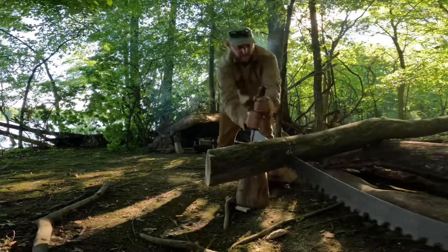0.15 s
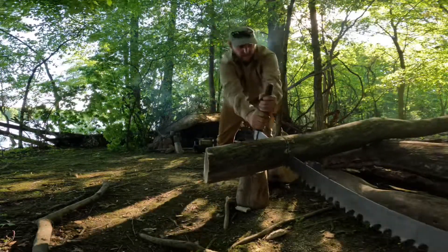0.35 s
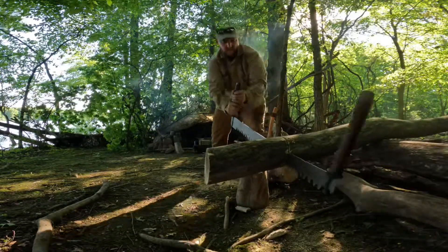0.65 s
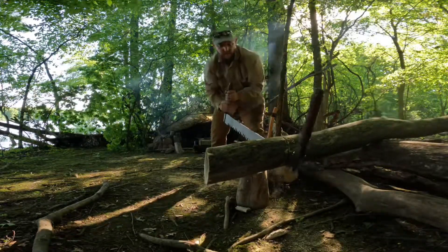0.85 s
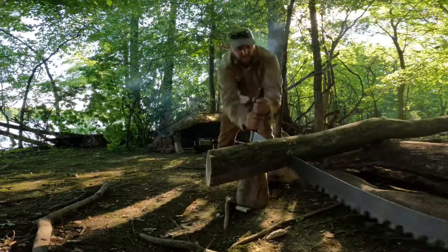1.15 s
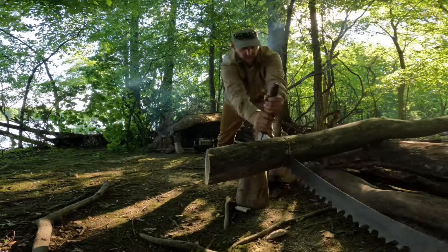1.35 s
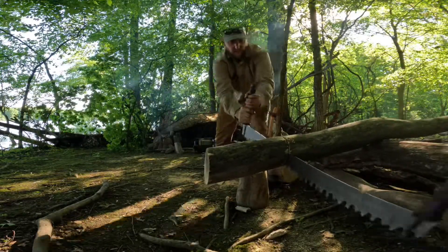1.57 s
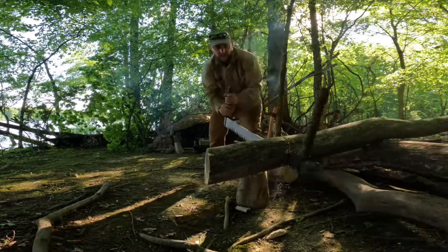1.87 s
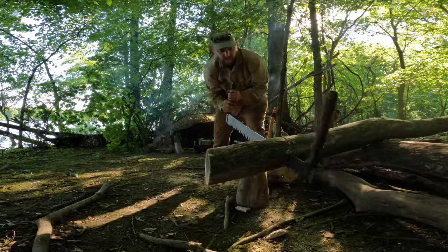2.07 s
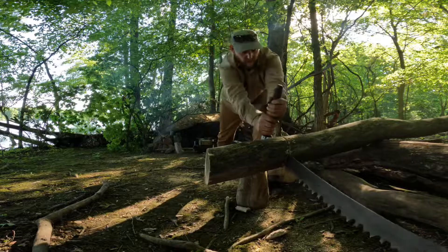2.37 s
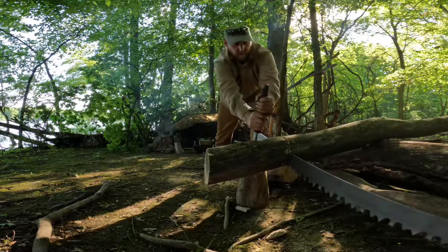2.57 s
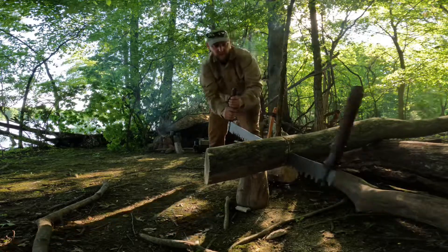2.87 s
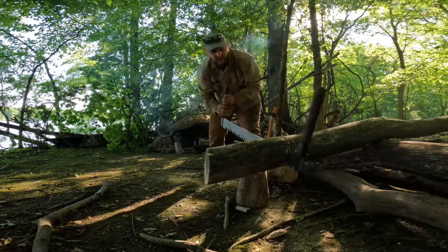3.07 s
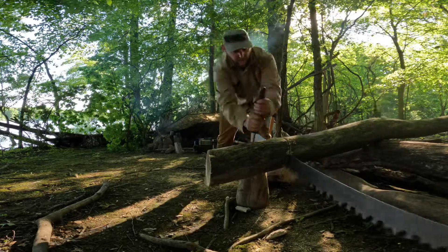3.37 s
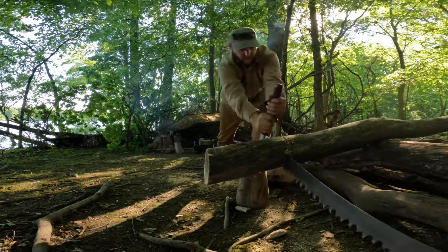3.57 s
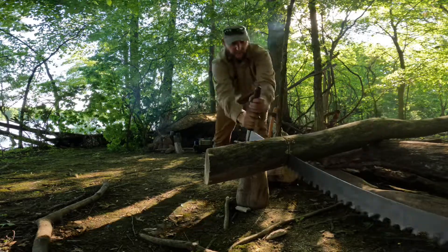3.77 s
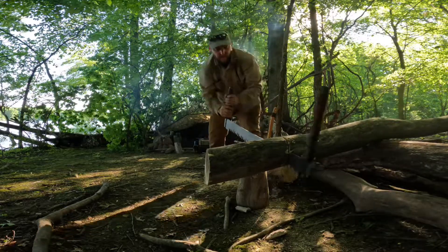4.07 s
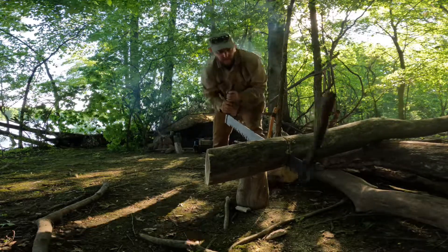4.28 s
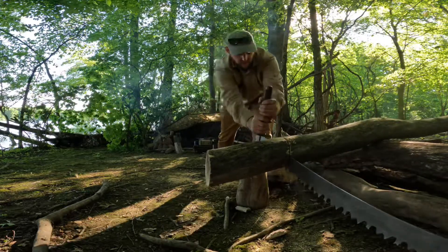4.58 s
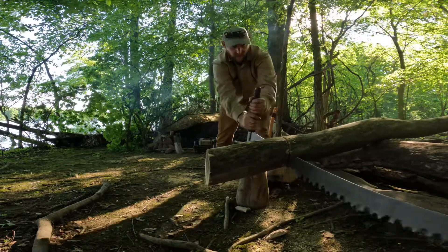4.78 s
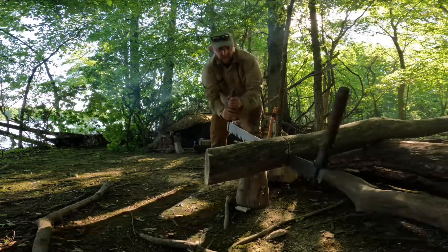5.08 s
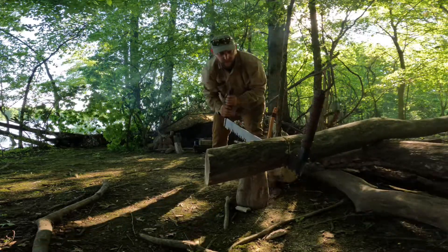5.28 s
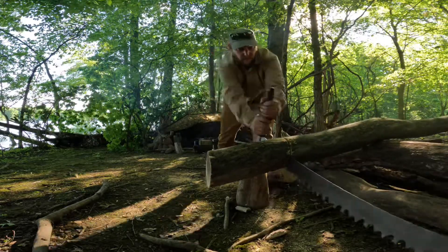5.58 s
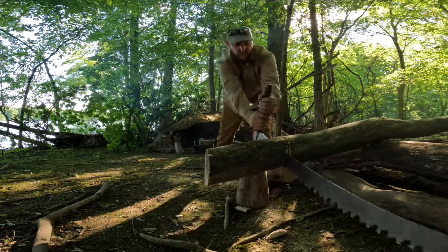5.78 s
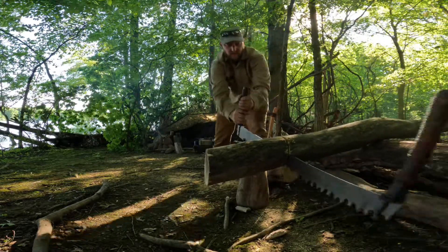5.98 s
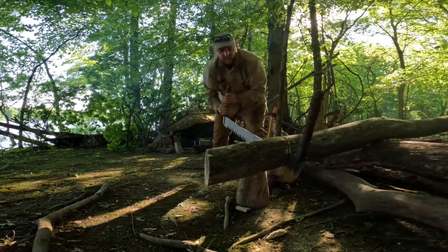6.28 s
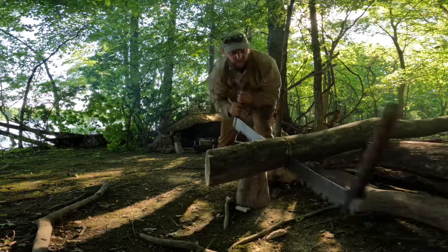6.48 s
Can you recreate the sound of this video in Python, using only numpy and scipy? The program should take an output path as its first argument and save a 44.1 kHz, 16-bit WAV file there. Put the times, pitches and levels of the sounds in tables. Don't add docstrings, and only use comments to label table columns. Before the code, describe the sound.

Close to the microphone, a big toothed saw works steadily through a log in a quiet wood. Each push is a loud, bright, rasping tear of steel and fibres; each return pull is much softer, longer and snagging. The blade's free end sings thinly after the pushes, the handle and cut tick at the turns, and the log thuds low beneath. Sawing is still under way at the end.

```python
import sys
import numpy as np
from scipy import signal
from scipy.fft import rfft, irfft, next_fast_len
from scipy.io import wavfile
from scipy.ndimage import uniform_filter1d, map_coordinates

SR = 44100
rng = np.random.default_rng(int(sys.argv[2]) if len(sys.argv) > 2 else 0)


def magnitude_from_level(level_db):
    exponent = np.asarray(level_db, float) / 20
    return 10 ** exponent


def generate_wav(sig):
    pcm = np.round(np.clip(np.atleast_2d(sig).T, -1, 1) * 32767).astype(np.int16)
    wavfile.write(sys.argv[1], SR, pcm)


N = 292810


def saw():
    share, force_db, pick, out, load = stroke()
    shake_db, shake_at, _, rasp_db, rasp_gain_db = load
    feed_db = force_db + stillness() + hitches() + pick((1, 0)) * wobble(16)
    bite_db = bite(share, pick)
    bright_catch, blade_catch = snags()
    cut = tears(per_s=2500, spread_db=15, hiss=1.4, teeth_db=1.5)
    chips = tears(per_s=900, spread_db=-3.5, hiss=1.45, teeth_db=1.64)

    arch_db = pick((93, 19)) * (share - pick((0.47, 0.32))) ** 2
    blade_force = np.hypot(magnitude_from_level(feed_db + bite_db - arch_db + 3.88), blade_catch)
    fizz_level = np.hypot(magnitude_from_level(feed_db + bite_db + pick((-14, -14.5)) + 5.0), bright_catch)

    wood_bite_db = pick((0.65, 1)) * bite(share + pick((0.029, -0.051)), pick)
    wood_db = feed_db + rasp_db + rasp_gain_db * (share - .5) + pick((-11.5, -6)) + wood_bite_db

    shaking_db = shake_db * np.exp(-((share - shake_at) / 0.17) ** 2)
    thud_db = force_db + pick((-17.5, -16.5)) + pick((0.33, .17)) * bite_db + shaking_db

    steel = blade(cut, blade_force, out)
    fizz = fizz_level * sawdust_fizz(cut)
    wood = magnitude_from_level(wood_db + 1.82) * torn_wood(chips)
    thud = magnitude_from_level(uniform_filter1d(thud_db, size=1500)) * log_thud(chips)
    return steel + fizz + wood + thud


def blade(cut, force, out):
    mode_hz = [2715, 3400, 3526, 3780, 3900, 4038, 4363, 4490, 4620, 5100, 5600, 5860, 6250, 6445, 7425,
               8590, 9835, 11160]
    # (width [Hz], level [dB], share of blade out where it speaks best [0-1])
    mode_rows = [(95, -10, 0.81), (90, -9, 0.21), (90, -1, 0.84), (96, 0.5, 0.91), (90, -5, 0.24),
                 (51.3, 2, 0.85), (54.4, 4, 0.64), (87.4, 2.5, 0.3), (120, -4.5, 0.23), (200, -12.5, 0.19),
                 (72.4, -6, 0.6), (89.5, -1, 0.29), (177, -8.5, 0.34), (79, 0, 0.47), (127, -8, 0.39),
                 (180, -9.5, 0.35), (54, -14, 0.75), (90, -14.5, 0.76)]
    wall_strikes = tears(per_s=130, spread_db=7, hiss=.1, teeth_db=.3)
    push = force * unit(cut + 0.6 * wall_strikes)
    steel = np.zeros(N)
    power = 0
    for k, (hz, (width_hz, db, best)) in enumerate(zip(mode_hz, mode_rows)):
        coupling_db = db - 22.3 * (out - best) ** 2 + 2.2 * wobble(26)
        steel += (-1) ** k * mode(push * magnitude_from_level(coupling_db), hz, width_hz)
        power += magnitude_from_level(2 * db) * np.pi * width_hz / SR
    return steel / np.sqrt(power)


def sawdust_fizz(cut):
    # (frequency [Hz], density [dB per Hz])
    fizz_spectrum = [(3820, -26), (6500, 0.5), (6920, -28), (7630, -4), (8060, -6.5), (11500, -12.5),
                     (14000, -22.5), (15600, -26)]
    return coloured(mottled(cut, patchy_db=4.0, scatter=0), fizz_spectrum)


def torn_wood(chips):
    # (frequency [Hz], density [dB per Hz])
    rasp_spectrum = [(150, -17.5), (300, 1.5), (500, -4), (800, 3), (1200, 1), (2000, 1.5), (3100, 1),
                     (5200, -2), (6900, -9), (9000, -30)]
    return coloured(mottled(chips, patchy_db=2.5, scatter=0), rasp_spectrum)


def log_thud(chips):
    # (frequency [Hz], width [Hz], level [dB])
    log_modes = [(122.7, 10.8, 2.5), (201, 90, -8.5), (353.4, 5.7, -4.5), (462, 3.8, -2.5)]
    # (frequency [Hz], density [dB per Hz])
    shake_spectrum = [(12, -37), (20, -15), (114, 4.5), (166, -2.5), (252, -13), (371, -22.5), (400, -8),
                      (520, -78), (880, -120)]
    body = unit(sum(magnitude_from_level(db + 2.2 * wobble(8)) * mode(chips, hz, width_hz) for hz, width_hz, db in log_modes))
    shake = coloured(rng.standard_normal(N) * magnitude_from_level(0.33 * wobble(10)), shake_spectrum)
    return magnitude_from_level(-3.0) * body + magnitude_from_level(-3.5) * shake


def tears(per_s, spread_db, hiss, teeth_db):
    sizes = magnitude_from_level(spread_db * rng.random(N)) * np.sign(rng.standard_normal(N))
    snap = (rng.random(N) < per_s / SR) * sizes
    bunch = magnitude_from_level(teeth_db * (wobble(35) + 1.05 * wobble(110)))
    return unit(bunch * (unit(snap) + hiss * rng.standard_normal(N)))


def snags():
    # (time [s], peak [dB], low part above peak [dB])
    catches = [(0.0538, -28, 6), (0.4968, -8.5, 16.5), (0.6833, -9, -5), (0.7205, -11, 17),
               (0.8155, -10.5, -6), (1.5293, -15, 25), (1.6372, -23, 2), (1.6861, -15, 15),
               (1.7789, -8.5, -4), (1.8981, -9, -7), (2.1565, -30, 24), (2.1949, -16, -1), (2.718, -15, 18),
               (2.808, -11.5, 19), (3.0024, -8.5, -7), (3.2251, -33, 11), (3.263, -17, 26),
               (3.296, -5.5, 0), (4.0003, -17, -1), (4.134, -11, -8), (4.4179, -14, 3), (4.871, -12, 21),
               (5.115, -12, 15), (5.4904, -30, -6), (5.9415, -13, 22), (6.1075, -12.5, 16),
               (6.1396, -10.5, 16), (6.1814, -15, 14), (6.249, -10.5, 14.5), (6.4931, -17, 0)]
    surge = np.zeros((2, N + SR))
    t = np.arange(SR // 10) / SR
    shape = (1 - np.exp(-t / 0.0012)) * np.exp(-t / 0.0084)
    for s, db, low_db in catches:
        start = round(s * SR)
        surge[:, start:start + len(t)] += magnitude_from_level([[db - 11.5], [db + low_db - 22.5]]) * shape
    return surge[:, :N]


def stroke():
    # (turn [s], lag of the bite [s], stroke length [s], force [dB],
    # force gained along the stroke [dB])
    stroke_rows = [(-.06, 0.0055, 0.43, -18, 3), (0.366, 0.024, 0.52, -27.5, 6),
                   (0.949, 0.0096, .46, -17.5, -4), (1.394, -0.025, 0.61, -28, 12),
                   (2.044, 0.0017, 0.45, -16.5, -1.5), (2.494, -0.017, .64, -27.5, 10.5),
                   (3.151, -0.0029, .47, -17.5, -4), (3.608, -0.0054, 0.63, -26.5, 4.5),
                   (4.274, 0.011, .43, -17.5, -10.5), (4.711, 0.015, 0.61, -28, 7.5),
                   (5.331, 0.011, 0.41, -18.5, -6.5), (5.755, 0.042, 0.6, -27.5, -2.5),
                   (6.428, 0.0051, 0.32, -16, -5)]
    # (shaking [dB], share of the stroke where it peaks [0-1], humming [dB],
    # rasp [dB], rasp gained along the stroke [dB])
    load_rows = [(8, 0.7, 0, 3, -8), (3, 1, .5, 1.5, -6.7), (5, 0.62, 2.5, 1.7, 2.5),
                 (5.5, 0.43, 1.5, -0.1, -6.8), (6, 0.77, .5, 1.2, 4), (5.5, 0.47, 2.5, -0.2, -6.5),
                 (7.5, 0.74, .5, -0.1, -3), (3.5, 0.99, -1, -0.4, -1.8), (9, 0.66, -2, 0.6, 2.5),
                 (2.5, 0.57, .5, 1.2, -7), (8.5, 0.69, 4, 2.5, 0.7), (9, 0.73, 2, .3, -8),
                 (8.5, 0.65, -6, 0.1, .3)]
    turn, lag, length, force_db, gain_db = np.transpose(stroke_rows)
    t = np.arange(N) / SR
    k = np.searchsorted(turn, t, side="right") - 1
    share = (t - turn[k] - lag[k]) / length[k]
    out = np.interp(t, [*turn, turn[-1] + length[-1]], np.arange(len(turn) + 1) % 2)

    def pick(rule):
        return np.array(rule)[k % 2]

    return share, force_db[k] + gain_db[k] * (share - .5), pick, out, np.transpose(load_rows)[:, k]


def bite(share, pick):
    # (share of the stroke [0-1], level [dB])
    push_bite = [(.01, -45), (.11, -22.5), (.21, -7), (.3, -3), (.51, -3.5), (.8, -5.5), (.9, -33.5),
                 (.99, -61)]
    # (share of the stroke [0-1], level [dB])
    pull_bite = [(.01, -20.5), (.1, -10), (.2, -3), (.3, 0), (.8, -0.5), (.9, -7), (.99, -22.5)]
    push_db = np.interp(share, *np.transpose(push_bite))
    pull_db = np.interp(share, *np.transpose(pull_bite))
    return uniform_filter1d(np.where(pick((True, False)), push_db, pull_db), size=400)


def hitches():
    # (time [s], level [dB], half length [s])
    feed_bumps = [(0.02, -5.5, 0.025), (0.472, 7.5, 0.037), (0.55, -2.8, 0.015), (0.629, 3.5, 0.0063),
                  (0.693, -3, 0.009), (0.847, 3, 0.014), (1.55, 6.5, 0.02), (1.688, 7, 0.0086),
                  (1.958, -2, 0.007), (1.974, 6, 0.0066), (2.78, -1, 0.012), (2.857, 2, 0.03),
                  (3.85, -3.2, 0.026), (3.915, 3.6, 0.01), (4.192, -7, 0.011), (4.326, 4, 0.0074),
                  (4.639, -12, 0.017), (4.756, 12.5, 0.0057), (4.883, 3.8, 0.0069), (5.094, -10.5, 0.0055),
                  (5.245, -5, 0.024), (5.857, 5, 0.0095), (5.961, 2.5, 0.0084), (6.172, -5.5, 0.0075),
                  (6.248, -2, 0.0076), (6.363, -5, 0.004)]
    s, db, half = np.transpose(feed_bumps)[:, :, None]
    t = np.arange(0, N, 50) / SR
    coarse = (db * np.exp(-((t - s) / half) ** 2)).sum(axis=0)
    return uniform_filter1d(np.repeat(coarse, 50)[:N], size=50)


def stillness():
    # (from [s], to [s], level [dB])
    standstills = [(0.367, 0.38, -17), (0.91, 0.987, -12), (1.394, 1.446, -8), (2.032, 2.042, -20),
                   (2.508, 2.566, -10), (3.156, 3.166, -36), (3.633, 3.689, -14), (4.257, 4.292, -6),
                   (4.704, 4.727, -12), (5.293, 5.322, -10), (5.725, 5.746, 11.5)]
    rows = []
    for a, b, db in standstills:
        rows += [(a - .02, 0), (a, db), (b - .002, db), (b, 0)]
    return curves(rows)[0]


def singing():
    # (full voice [s], 5539 Hz mode [dB], its fading [dB per s], lowest pair [dB], other modes
    # [dB])
    push_ends = [
        (.27, -35.5, 30, -37, -36),
        (1.3, -36.5, 30, -36.5, -35),
        (2.38, -30.5, 77, -36.5, -35.5),
        (3.49, -35, 70, -27, -39),
        (4.6, -39.5, 22, -42, -37),
        (5.7, -30.5, 62, -38, -43),
    ]
    # (frequency [Hz], level [dB])
    free_modes = [(3345, 0), (3388, -2), (3478, -12), (3572, -13), (3695, -13), (3785, -11), (4028, -11),
                  (4352, -11), (4490, -10), (7345, -17)]
    s, db, fade, pair_db, middle_db = np.transpose(push_ends)[:, :, None]
    t = np.arange(N) / SR - s
    before, after = np.minimum(t, 0), np.maximum(t, 0)
    mute_db = 120 * np.maximum(t - 0.27, 0)
    top_db = (db + 70 * before - fade * after - mute_db).max(axis=0)
    lower_db = 112 * before - 145 * after - mute_db

    share, force_db, pick, out, load = stroke()
    hum_db = load[2]
    bite_db = bite(share, pick)
    jolt = .15 + 2.2 * np.clip((force_db + bite_db + 42) / 14, 0, 1)

    pair, middle = [unit(sum(magnitude_from_level(level) * tone(hz, jolt + .3, swell_db=5) for hz, level in modes))
                    for modes in (free_modes[:2], free_modes[2:])]
    low = magnitude_from_level((pair_db + lower_db).max(axis=0)) * pair + magnitude_from_level((middle_db + lower_db).max(axis=0)) * middle

    driven_db = force_db + bite_db - 22 - 60 * (out - .75) ** 2 + 3 * wobble(20)
    overhang = np.clip(out / .3, 0, 1) ** 2
    top = np.hypot(magnitude_from_level(top_db - 4.5), magnitude_from_level(driven_db)) * overhang * tone(5539, jolt, swell_db=0.0)

    choke_db = pick((30, -8)) * np.exp(-((share - pick((0.44, 1))) / 0.12) ** 2)
    hum_level = magnitude_from_level(force_db + hum_db + pick((-16, -23)) + bite_db - choke_db)
    hum = hum_level * tone(569, 0.61 * jolt, swell_db=1.0)
    return top + low + hum


def ticks():
    # (time [s], peak [dB], pitch [Hz])
    knocks = [(0.361, -51, 3300), (0.384, -32.5, 1900), (0.892, -21.5, 1940), (0.916, -33.5, 1040),
              (0.963, -36, 1500), (1.417, -42, 3390), (1.441, -35, 3900), (1.966, -22, 1760),
              (1.999, -31, 884), (2.039, -45, 993), (2.068, -49, 2530), (2.468, -38, 3320),
              (2.549, -31, 3170), (3.149, -32.5, 1500), (3.62, -50, 3350), (3.658, -41, 1680),
              (3.679, -34, 3640), (4.3, -23.5, 1770), (4.716, -39.5, 1680), (4.783, -32, 3540),
              (5.332, -38, 1500), (5.733, -34, 3360), (5.774, -35, 3200), (6.25, -27, 5000),
              (6.452, -40, 1680)]
    out = np.zeros(N + SR)
    t = np.arange(SR // 20) / SR
    for s, db, hz in knocks:
        click = 1.6 * np.sin(2 * np.pi * hz * t) * magnitude_from_level(-60 * t / .006) * (1 - np.exp(-t / .00015))
        crack = rng.standard_normal(len(t)) * magnitude_from_level(-60 * t / 0.014)
        crack = mode(mode(crack, 3000, 4500), 3000, 4500)
        rattle = mode(rng.standard_normal(len(t)) * magnitude_from_level(-60 * t / 0.12), 1100, 670)
        start = round(s * SR)
        out[start:start + len(t)] += magnitude_from_level(db + 4.0) * (click + 0.63 * crack + 0.93 * rattle)
    return out[:N]


def squeak():
    start_s, length_s, base_hz, rise_hz = 5.274, .02, 5050, 450
    u = np.clip((np.arange(N) / SR - start_s) / length_s, 0, 1)
    phase = 2 * np.pi * np.cumsum(base_hz + rise_hz * np.sqrt(u)) / SR
    return magnitude_from_level(-33) * np.sin(np.pi * np.sqrt(u)) * np.sin(phase)


def woods():
    # (frequency [Hz], density [dB per Hz])
    air_spectrum = [(15, -31), (25, 32.5), (131, 30), (833, -41), (3090, 1), (3350, -85), (5140, -75),
                    (5570, -45), (6040, -52), (15000, -61)]
    air = rng.standard_normal(N) + 0.18 * rng.standard_normal((2, N))
    return magnitude_from_level(-43.0 + 1.5 * wobble(3.1)) * coloured(air, air_spectrum)


def ports(x):
    # (frequency [Hz], left minus right [dB])
    lean = [(60, 3.5), (150, -1.5), (380, -1.0), (950, -2.0), (2380, -3.5), (5980, -2.0), (15000, 0.5)]
    # (frequency [Hz], left ahead of right [radians])
    lead = [(100, 0.066), (700, -0.22), (1500, -0.24), (2600, -0.75), (4500, -0.6), (8000, 0.21),
            (14000, 0.87)]
    # (frequency [Hz], left-right likeness [0-1])
    alike = [(40, .995), (90, .95), (300, .985), (1400, .96), (2800, .94), (5500, .965), (10000, .9),
             (14000, .75)]
    sign = np.array([[.5], [-.5]])

    def spread(hz):
        angle = np.arccos(np.clip(along(alike, hz), 0, 1)) / 2
        return np.array([np.cos(angle), np.sin(angle)])

    def offset(hz):
        return magnitude_from_level(sign * along(lean, hz)) * np.exp(1j * sign * along(lead, hz))

    stray = 1.4 * mottled(x, patchy_db=0, scatter=3)
    mid, side = filtered(np.array([x, stray]), spread)
    return filtered(np.array([mid + side, mid - side]), offset)


def mode(x, hz, width_hz):
    return signal.lfilter(*signal.iirpeak(hz, hz / max(width_hz, 1), SR), x)


def tone(hz, drift, swell_db):
    phase = 2 * np.pi * hz * np.arange(N) / SR + drift * wobble(40)
    return np.sqrt(2) * magnitude_from_level(swell_db * wobble(4.085)) * np.sin(phase)


def mottled(x, patchy_db, scatter):
    z = signal.stft(x, nperseg=512)[2]
    field = uniform_filter1d(rng.standard_normal(z.shape), size=7, axis=0)
    field = uniform_filter1d(field, size=4, axis=1)
    z = z * magnitude_from_level(patchy_db * unit(field)) * np.exp(1j * scatter * rng.standard_normal(z.shape))
    return signal.istft(z, nperseg=512)[1][:N]


def coloured(x, spectrum):
    return unit(filtered(x, lambda hz: magnitude_from_level(along(spectrum, hz))))


def filtered(x, response):
    m = next_fast_len(N + 8192)
    return irfft(rfft(x, m) * response(np.fft.rfftfreq(m, 1 / SR)), m)[..., :N]


def along(points, hz):
    f, v = np.transpose(points)
    return np.interp(np.log(hz + 1), np.log(f + 1), v)


def curves(rows):
    s, *cols = np.transpose(rows)
    return [np.interp(np.arange(N) / SR, s, c) for c in cols]


def wobble(rate):
    return map_coordinates(rng.standard_normal(N // 100), [np.arange(N) * rate / SR])


def unit(x):
    return x / np.sqrt(np.mean(x ** 2) + 1e-20)


def scene():
    return ports(saw() + singing() + ticks() + squeak()) + woods()


def low_pass(x):
    return signal.sosfilt(signal.butter(12, 15720, fs=SR, output="sos"), x)


def record(dry):
    ceiling, knee, top_hz = .6, 3, 15750
    held = dry / (1 + np.abs(dry / ceiling) ** knee) ** (1 / knee)
    mix = filtered(held, lambda hz: hz < top_hz)
    return low_pass(mix)


dry = scene()
out = record(dry)
generate_wav(out)
```